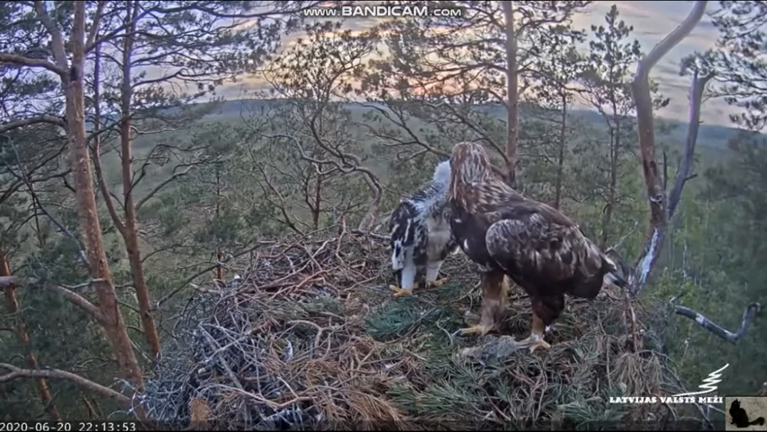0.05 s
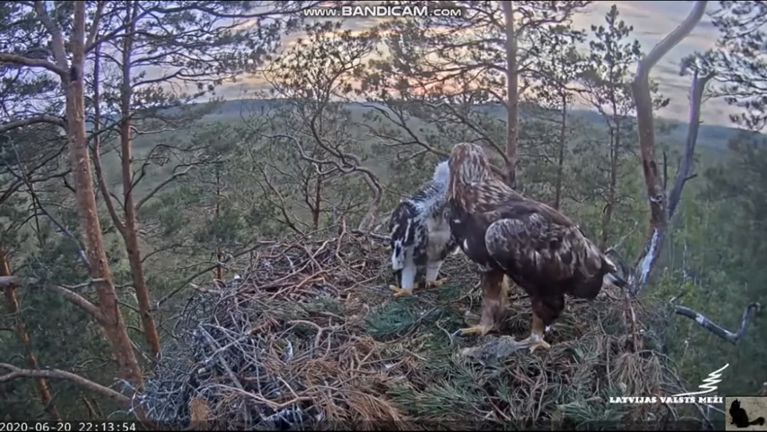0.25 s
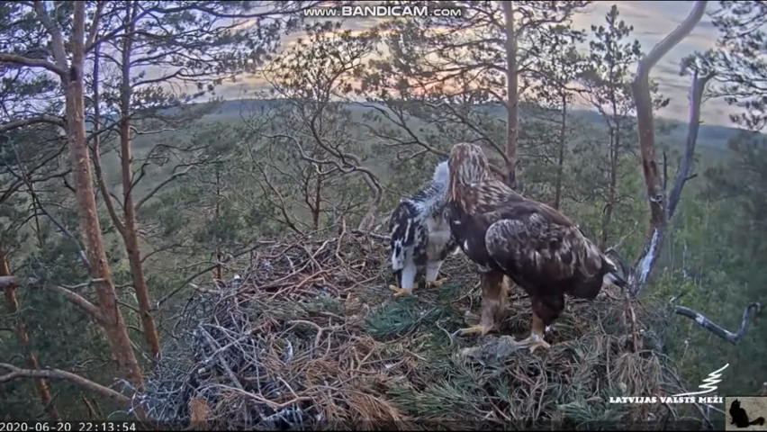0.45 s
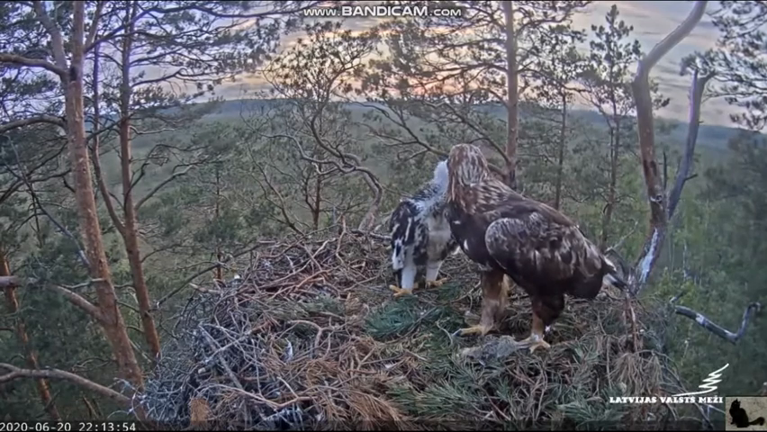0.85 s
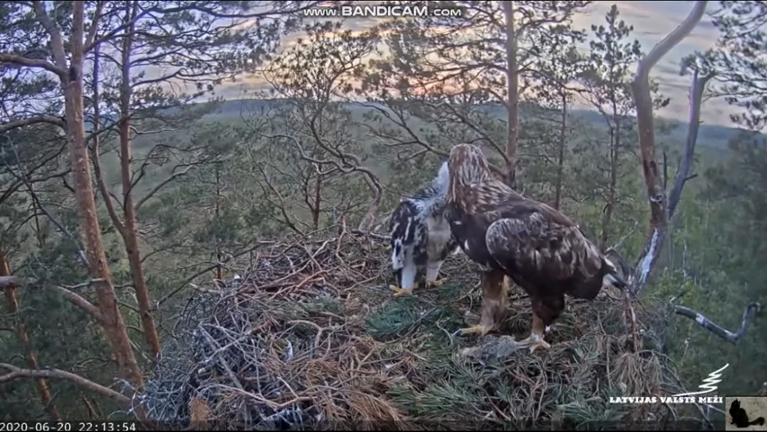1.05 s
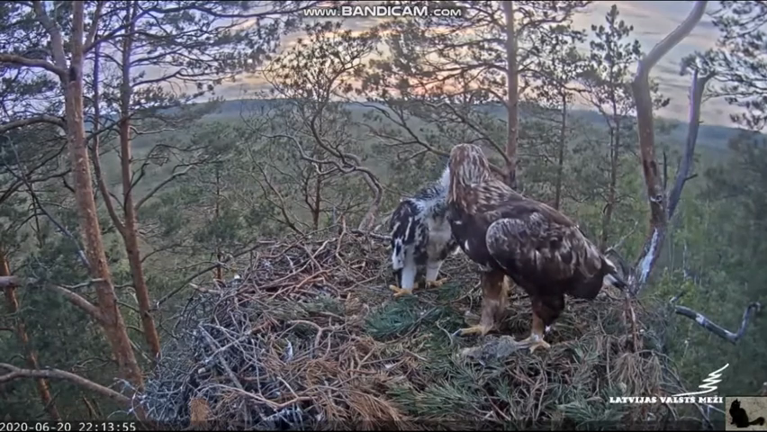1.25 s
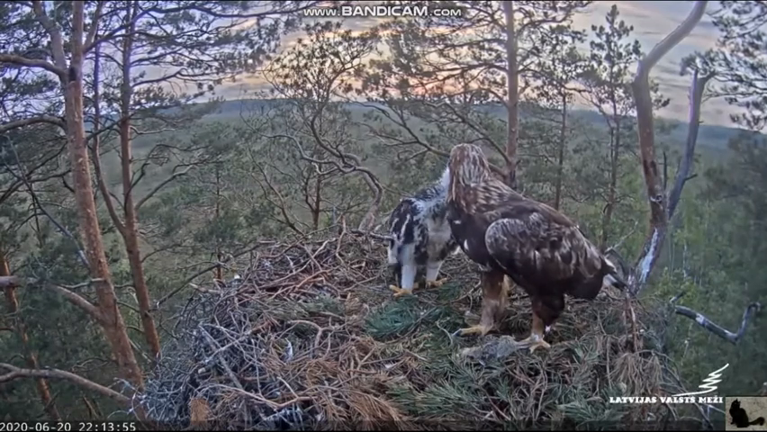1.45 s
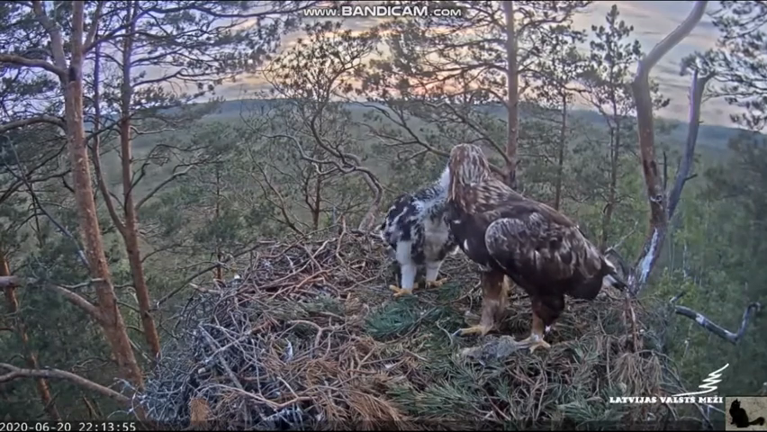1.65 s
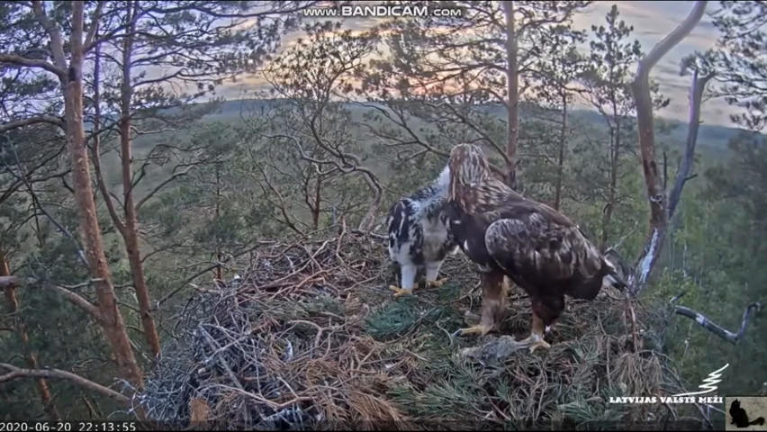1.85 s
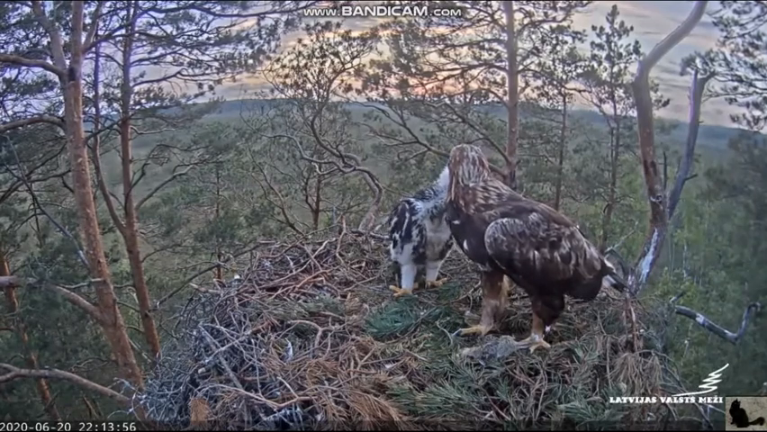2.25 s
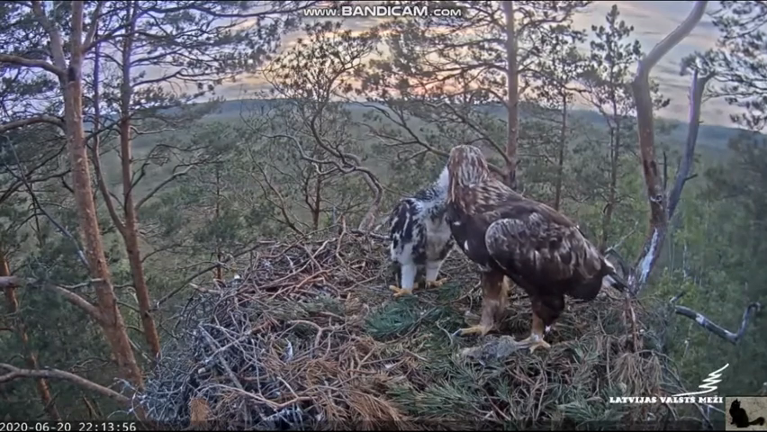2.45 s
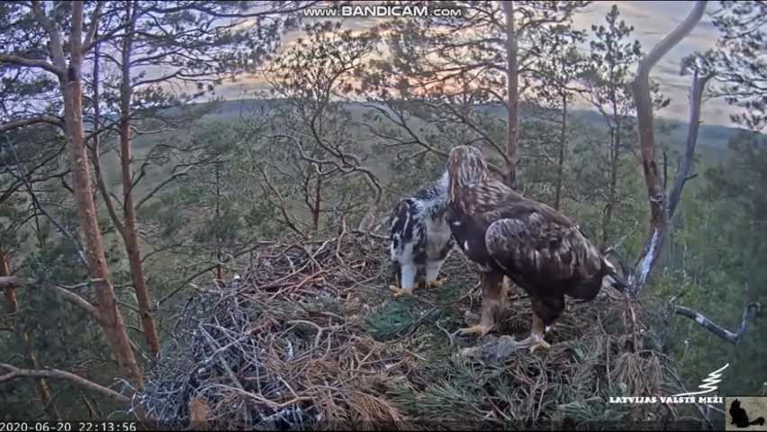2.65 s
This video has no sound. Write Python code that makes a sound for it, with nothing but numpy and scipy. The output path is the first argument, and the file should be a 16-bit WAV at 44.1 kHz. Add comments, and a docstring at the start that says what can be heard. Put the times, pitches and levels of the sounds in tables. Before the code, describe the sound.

An eagle calls four times, thin rising whistles breaking into harsh yelps, over steady hiss.

```python
"""Eagle calling from a pine nest

An eagle calls four times, over microphone hiss and a low rumble. Each call is a thin rising whistle
that breaks down into a loud yelp, shaped by the throat and turning harsh as it sags. The last two
calls have a soft lead-in and lower notes under the whistle. The forest rings after each call."""
import sys
import numpy as np
from scipy import signal
from scipy.fft import rfft, irfft
from scipy.io import wavfile
from scipy.ndimage import uniform_filter1d, minimum_filter1d

SR = 44100
rng = np.random.default_rng(int(sys.argv[2]) if len(sys.argv) > 2 else 0)


def master_out(mix):
    """Clip the mix to full scale and print it as 16-bit PCM to the path in sys.argv[1]."""
    frames = np.transpose(np.atleast_2d(mix))
    ceiling = np.clip(frames, -1, 1)
    pcm = np.round(ceiling * 32767).astype(np.int16)
    wavfile.write(sys.argv[1], SR, pcm)


N = 119070

# hiss spectrum (frequency [Hz], relative density [dB])
HISS_SPECTRUM = [(260, -68), (450, -37.5), (870, -20.5), (1130, -10), (1500, -19), (2270, -10.5),
                 (2700, -15), (3800, -18.5), (5200, -17), (7000, -11.5), (9500, -8.5), (12000, -10.5),
                 (13800, -15.5)]
# rumble spectrum (frequency [Hz], relative density [dB])
RUMBLE_SPECTRUM = [(15, -73), (25, -43), (54, -36.5), (122, -2), (150, 3.5), (259, -7.5), (384, -26),
                   (480, -37.5), (620, -75), (1060, -120)]
# whistles (start [s], length [s], target pitch [Hz], rise [s], level [dB], catch at [s], step up [Hz])
WHISTLES = [(.085, .191, 4498, 0.038, -20.5, 0.12, 145), (.746, 0.22, 4367, 0.037, -22, .122, 120),
            (1.434, .183, 4603, .068, -24, 0.138, 19.6), (2.115, 0.2, 4490, 0.076, -25, .095, 69)]
# yelps; the first ends before time zero, so only its echo is heard
# (start [s], length [s], pitch [Hz], level [dB], settling [s], crack gain [dB], sag onset [0-1])
YELPS = [(-.38, .15, 1172, -8, 0.0111, -2, 0.445), (.276, 0.14, 1170, -10.5, 0.009, 1, 0.39),
         (.945, .15, 1146, -12, .016, 2.5, 0.5), (1.616, .154, 1149, -11, .028, 0, 0.47),
         (2.312, .148, 1151, -12.5, 0.0248, 1, 0.47)]
# course of a yelp (progress [0-1], gain [dB], harshness [0-1], outer partial gain [dB])
YELP_COURSE = [(0, -2.5, 0.65, -10), (.06, -6.5, 0.99, -28), (.15, -4.5, 0.38, -21), (0.258, -1, 0.09, -7),
               (.42, -8, 0, -14.5), (0.522, 1, 0.21, -2), (.62, -9, 0.28, 5.5), (.73, -5, 1, 0),
               (.85, -17, 0.87, 5), (1, -19.5, 0.8, 0)]
# yelp harmonics (pitch multiple [x], gain [dB])
HARMONICS = [(1, -4), (2, -1), (3, -11), (4, -18.5)]
# partials between the harmonics of a harsh voice (pitch multiple [x], gain [dB])
SUBTONES = [(1.25, -11.5), (1.5, -2.5), (1.75, -20.5), (2.25, -21), (2.5, -11), (3.5, -20)]
# faint partials below and above the throat band (pitch multiple [x], gain [dB])
OUTER_PARTIALS = [(.25, -32.5), (.5, -40.5), (5, -33.5), (6, -25)]
# throat resonances (frequency [Hz], gain [dB])
THROAT = [(800, -8.5), (1120, 0), (1400, -7.5), (1720, 2.5), (2000, -3), (2200, 0), (2310, 7), (2450, -4.5),
          (2600, 1), (2950, -1), (3200, -20), (3420, -6), (3780, -26), (4300, -5.5), (4700, -12.5),
          (5100, -80), (8000, -55)]
# rasp spectrum (frequency [Hz], relative density [dB])
RASP_SPECTRUM = [(500, -50), (850, -49), (1100, 20), (1800, 35), (2900, -24), (3600, -49), (4300, 7.5),
                 (5000, -36), (9000, -50)]
# bursts as the voice cracks (delay [s], length [s], pitch [Hz], gain [dB])
CRACK_BURSTS = [(.004, 0.025, 1761, -9.5), (.01, 0.0045, 2944, -10)]
# echoes from nest and trunks (delay [s], gain [dB])
ECHOES = [(.0043, -17), (.0098, -12), (.0172, -15.5), (.029, -23.5)]
# forest decay (frequency [Hz], T60 [s])
FOREST_T60 = [(300, 0.63), (1100, 0.7), (2300, 0.67), (3400, 0.34), (4500, 0.51), (9000, 0.14)]
# colour of the scattered sound (frequency [Hz], gain [dB])
FOREST_COLOUR = [(500, -2), (1100, 2.5), (1700, 2.5), (2300, 1.5), (3400, 12), (4500, 9), (7000, 8)]
# lead-ins (start [s], length [s], from [Hz], to [Hz], level [dB])
LEAD_INS = [(1.295, .15, 2330, 3530, -37.5), (2.015, 0.13, 2470, 3415, -38.5)]
# lower notes
# (start [s], length [s], pitch [Hz], sag [Hz], overshoot [Hz], level [dB], attack [s], release [s])
LOW_NOTES = [(1.437, .105, 1956, 337, 1089, -28, 0.0034, 0.033),
             (2.155, 0.13, 2063, 316, 1, -18.5, 0.039, 0.088),
             (2.174, 0.02, 1395, 40, 0, -32, 0.0073, 0.0078)]

JITTER_RATE_HZ, PREROLL_S = 330, .4


def amp(db):
    """Decibels to gain."""
    return 10 ** (np.asarray(db) / 20)


def unit(x):
    """Scale to rms 1."""
    return x / np.sqrt(np.mean(x ** 2) + 1e-20)


def lookup(table, hz):
    """Interpolate a table over log frequency."""
    f, value = np.transpose(table)
    return np.interp(np.log(hz + 1), np.log(f + 1), value)


def add(mix, start_s, sound):
    """Mix a sound in at start_s."""
    part = mix[max(round(start_s * SR), 0):][:len(sound)]
    part += sound[:len(part)]


def noise(spectrum):
    """Shaped noise, rms 1."""
    gain = amp(lookup(spectrum, np.fft.rfftfreq(N, 1 / SR)))
    return unit(irfft(rfft(rng.standard_normal(N)) * gain, N))


def waver(t, rate_hz):
    """Random wavering, low-passed at rate_hz."""
    f = np.fft.rfftfreq(SR, 1 / SR)
    return unit(irfft(rfft(rng.standard_normal(SR)) / (1 + (f / rate_hz) ** 4), SR))[:len(t)]


def tone(hz, multiple=1):
    """Sine partial on a pitch curve, rms 1."""
    return np.sqrt(2) * np.sin(2 * np.pi * (multiple * np.cumsum(hz) / SR + rng.random()))


def fade(t, attack_s, release_s):
    """Attack, hold, release."""
    ramp = np.minimum(t / attack_s, (t[-1] - t) / release_s)
    return np.sin(np.pi / 2 * np.clip(ramp, 0, 1)) ** 2


def background():
    """Steady microphone hiss over a low rumble."""
    return amp(-34.5) * noise(HISS_SPECTRUM) + amp(-42.5) * noise(RUMBLE_SPECTRUM)


def thin_tone(t, hz, jitter=.0092, flutter_db=3.5):
    """High register: one partial, unsteady in pitch and level."""
    return tone(hz * (1 + jitter * waver(t, 123))) * amp(flutter_db * waver(t, 94))


def whistle(length_s, target_hz, rise_s, db, catch_s, step_hz, from_hz=3350, overlap_s=.008):
    """The voice climbs and swells, catches and steps up, then strains and sags."""
    t = np.arange(0, length_s + overlap_s, 1 / SR)
    catch = (t - catch_s) / .005
    strain = np.clip((t - length_s) / .016 + 1, 0, 1)
    climb_hz = target_hz + (from_hz - target_hz) * np.exp(-t / rise_s)
    hz = climb_hz + step_hz * (1 + np.tanh(catch)) / 2 - 420 * strain ** 2
    swell_db = -13 * np.exp(-t / .1) + 1.5 * strain
    catch_db = -19 * np.exp(-catch ** 2)
    # rough shadow just under the pitch
    air = amp(-24.5) * tone(hz * (.91 + .039 * waver(t, JITTER_RATE_HZ)))
    return (thin_tone(t, hz) + air) * fade(t, .0053, .01) * amp(db + swell_db + catch_db)


def yelp(length_s, pitch_hz, db, settle_s, crack_db, sag_onset, break_hz=2767, plunge_s=.0095):
    """The voice cracks down through the throat resonances, holds clean, sags and splits into subtones."""
    t = np.arange(0, length_s, 1 / SR)
    progress = t / length_s
    knots, *columns = np.transpose(YELP_COURSE)
    course_db, harshness, outer_db = (np.interp(progress, knots, column) for column in columns)
    plunge = np.exp(-(t / plunge_s) ** 2)
    undershoot = .0645 * np.exp(-.5 * (t / settle_s) ** 2)
    sag = .17 * (np.maximum(progress - sag_onset, 0) / (1 - sag_onset)) ** 1.15
    hz = pitch_hz * (1 - undershoot - sag) + (break_hz - pitch_hz) * plunge
    jitter = .002 + .012 * harshness + .025 * plunge
    shaky_hz = hz * (1 + jitter * waver(t, JITTER_RATE_HZ))
    voice = sum(tone(shaky_hz, k) * amp(gain_db + lookup(THROAT, k * hz)) for k, gain_db in HARMONICS)
    subtones = sum(tone(shaky_hz, k) * amp(gain_db + lookup(THROAT, k * hz) + 2 * waver(t, 180))
                   for k, gain_db in SUBTONES)
    outer = sum(tone(shaky_hz, k) * amp(gain_db + outer_db) for k, gain_db in OUTER_PARTIALS)
    rasp = amp(-19.5) * noise(RASP_SPECTRUM)[:len(t)]
    rough = harshness * ((1 - plunge) * subtones + rasp)
    out = (voice + outer + rough) * fade(t, .0026, .0042) * amp(course_db)
    for delay_s, *burst in CRACK_BURSTS:
        add(out, delay_s, amp(crack_db) * crack(*burst))
    return out * amp(db)


def crack(length_s, hz, db, jitter=.041):
    """One rough burst in a throat resonance."""
    t = np.arange(0, length_s, 1 / SR)
    shaky_hz = hz * (1 + jitter * waver(t, JITTER_RATE_HZ))
    return tone(shaky_hz) * fade(t, length_s / 4, length_s / 2) * amp(db)


def scatter(t60_table):
    """Dense echoes, each band decaying by its T60."""
    hz, t, bands = signal.stft(rng.standard_normal(SR), SR, nperseg=256)
    decay = np.exp(-np.log(1000) * t / lookup(t60_table, hz)[:, None])
    energy = SR * np.mean(decay ** 2, axis=1, keepdims=True)
    gain = amp(lookup(FOREST_COLOUR, hz))[:, None] / np.sqrt(energy)
    return signal.istft(bands * decay * gain, SR, nperseg=256)[1][:SR]


def forest(x, branch_t60_s=.083):
    """Direct sound, near echoes, scatter from the branches and a long faint tail."""
    response = np.zeros(SR)
    response[0] = 1
    for delay_s, db in ECHOES:
        add(response, delay_s, amp([db]))
    add(response, .004, amp(-15.5) * scatter([(1, branch_t60_s)]))
    add(response, .025, amp(-14.5) * scatter(FOREST_T60))
    return signal.fftconvolve(x, response)[:len(x)]


def lead_in(length_s, from_hz, to_hz, db):
    """Soft glide up into the whistle."""
    t = np.arange(0, length_s, 1 / SR)
    hz = from_hz + (to_hz - from_hz) * (t / length_s) ** .87
    return thin_tone(t, hz) * fade(t, .003, .01) * amp(db)


def low_note(length_s, pitch_hz, sag_hz, overshoot_hz, db, attack_s, release_s):
    """Falling, nearly pure note under the whistle."""
    t = np.arange(0, length_s, 1 / SR)
    hz = pitch_hz + overshoot_hz * np.exp(-t / .0036) - sag_hz * (t / length_s) ** 2.005
    shaky_hz = hz * (1 + .018 * waver(t, 350))
    voice = tone(shaky_hz) + amp(-23) * tone(shaky_hz, multiple=3)
    return voice * fade(t, attack_s, release_s) * amp(db)


def eagle():
    """All parts of the calls, from PREROLL_S before time zero."""
    out = np.zeros(N + round(PREROLL_S * SR))
    for table, sound in (WHISTLES, whistle), (YELPS, yelp), (LEAD_INS, lead_in), (LOW_NOTES, low_note):
        for start_s, *row in table:
            add(out, start_s + PREROLL_S, sound(*row))
    return out


def scene():
    """Eagle in the forest over the background, mono."""
    return (forest(eagle())[-N:] + background())[None]


def record(dry, ceiling=.95, limiter_s=.006, cutoff_hz=14000):
    """Peak limiter, then low-pass."""
    size = round(limiter_s * SR)
    needed_gain = ceiling / np.maximum(abs(dry), ceiling)
    gain = uniform_filter1d(minimum_filter1d(needed_gain, 2 * size), size)
    lowpass = signal.firwin(511, cutoff_hz, window=("kaiser", 9), fs=SR)
    return signal.oaconvolve(dry * gain, lowpass[None], "same")


dry = scene()
out = record(dry)
master_out(out)
```